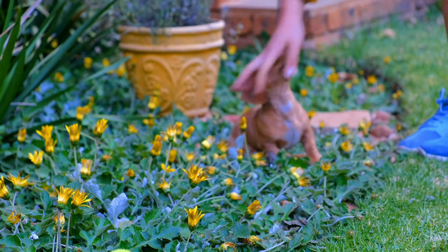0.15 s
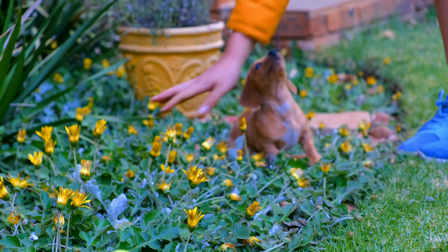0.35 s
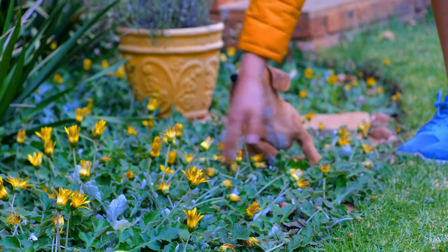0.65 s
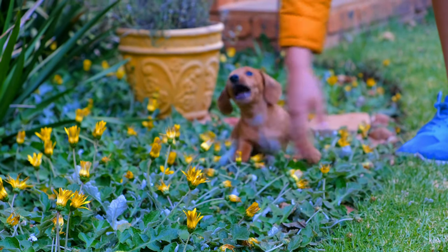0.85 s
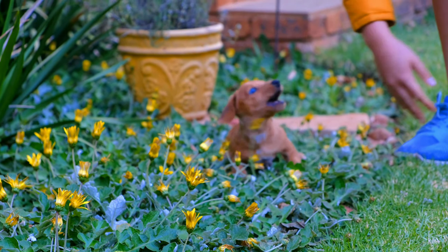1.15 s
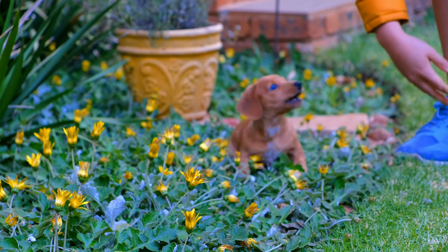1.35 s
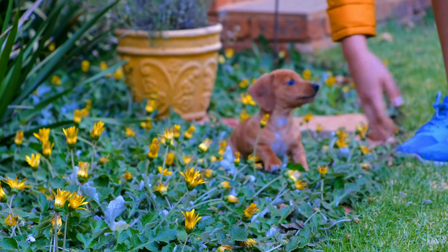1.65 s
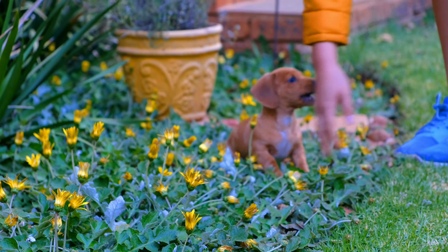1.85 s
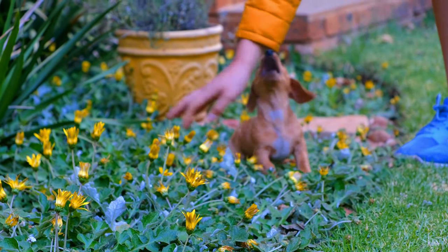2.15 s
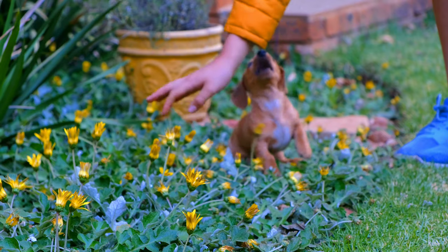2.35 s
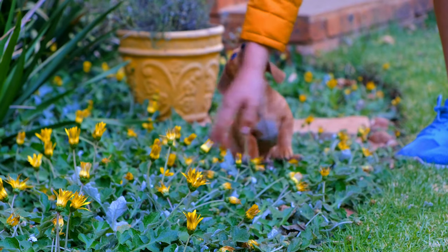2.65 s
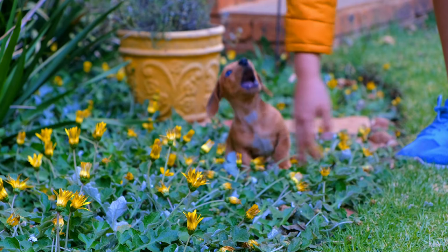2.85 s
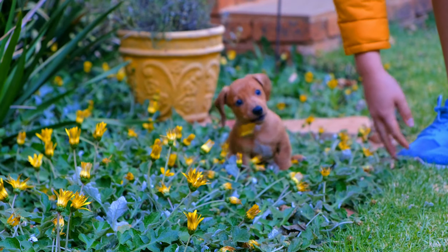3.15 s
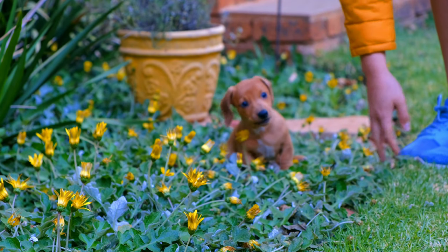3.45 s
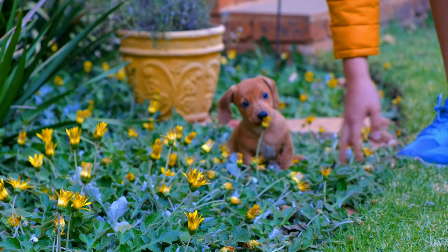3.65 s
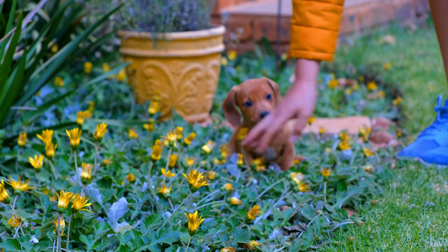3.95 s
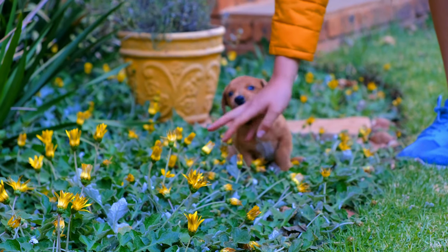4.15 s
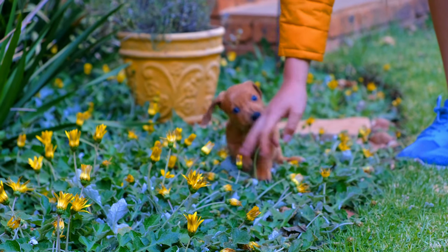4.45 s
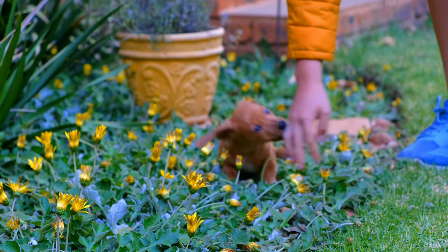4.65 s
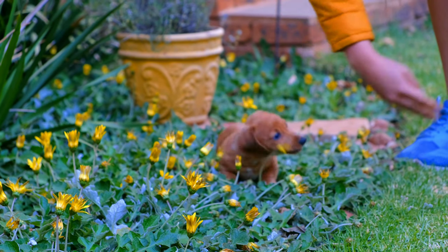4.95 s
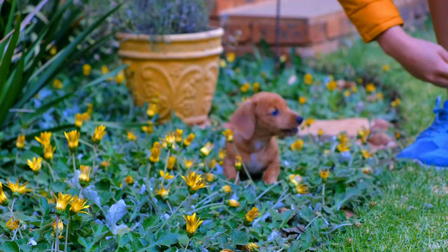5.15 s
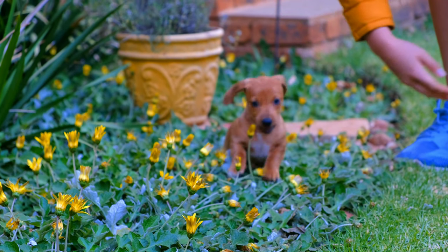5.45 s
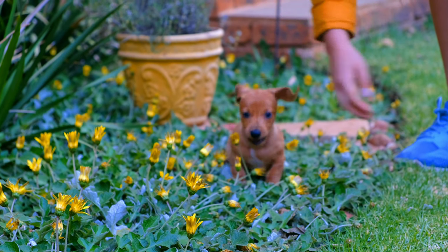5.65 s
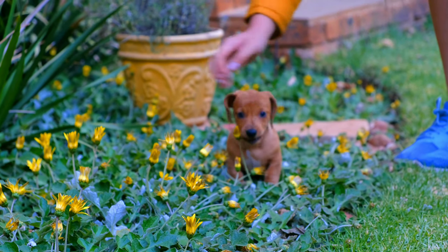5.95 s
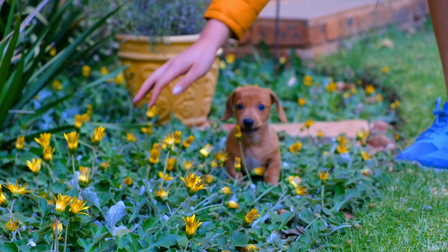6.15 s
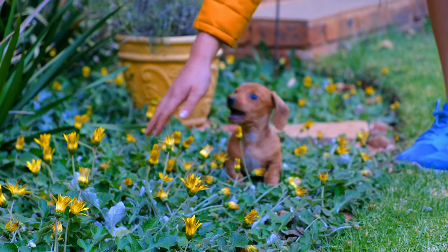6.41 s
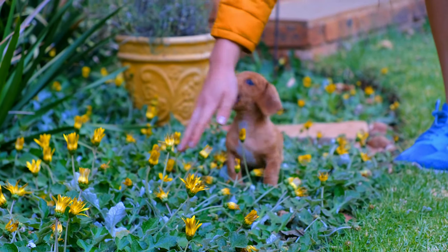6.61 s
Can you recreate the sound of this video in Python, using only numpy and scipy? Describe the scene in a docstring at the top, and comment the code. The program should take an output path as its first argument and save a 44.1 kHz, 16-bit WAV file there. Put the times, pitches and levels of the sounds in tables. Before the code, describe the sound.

Young puppy's sharp yelp and thin whimpering, a howl breaking high, then two pairs of raspy barks with a moan and growls, outdoors.

```python
"""Over a faint low rumble a small puppy yelps, whines and howls, then gives two hoarse double barks.
A moan follows the first pair; each pair sinks into a growl, the last one stuttering until the abrupt stop.
The voice is summed harmonics that flip between chest and falsetto, plus subharmonic rasp and filtered hiss.
Thin nasal whistles and a whimper are near-pure tones; growls are decaying throat resonances.
The puppy has a diffuse noise-built tail; very faint, brief sinking tones lie between the pairs of barks."""
import sys
import numpy as np
from scipy import signal
from scipy.fft import rfft, irfft, next_fast_len
from scipy.io import wavfile
from scipy.ndimage import uniform_filter1d, minimum_filter1d, map_coordinates

SR = 44100
rng = np.random.default_rng(int(sys.argv[2]) if len(sys.argv) > 2 else 0)


def transcribe(u):
    """Save the signal u as a 16-bit wav file named by the first command-line argument.

    u: samples, shape (n,) or (channels, n), limited to [-1, 1]; the rate is SR.
    q: integer samples, one column per channel.
    """
    v = np.clip(np.atleast_2d(u).T, -1, 1)
    q = np.round(v * 32767).astype(np.int16)
    wavfile.write(sys.argv[1], SR, q)


N = 298851
END_S, TOP_HZ = 6.243, 14200

# background spectrum, relative density: freq_hz, density_db
FLOOR_SPECTRUM = [(30, -37.5), (60, -24), (78, -8.5), (97, 0), (120, -6), (180, 0.5), (400, -9),
                  (1000, -16.5), (2000, -21), (9000, -27.5), (11700, -30.5), (14000, -52)]
FLOOR_DB = -64.5

# reverb decay: freq_hz, t60_s
TAIL_T60 = [(150, 0.45), (500, 0.73), (1100, 0.7), (1700, 0.5878), (3200, 0.42), (6000, 0.63), (12000, 0.2)]
# reverb spectrum: freq_hz, gain_db
TAIL_COLOUR = [(100, -4.5), (350, -0.5), (600, 0.5), (800, -3), (1100, 1.5), (1650, 5.5), (2000, -7.5),
               (2500, -3), (3300, 5), (4000, -2.5), (6000, -4.5), (12000, -10)]

# thin whistles: start_s, rise_s, fall_s, pitch_hz, end_pitch_hz, level_db
WHISTLES = [(.675, 0.072, .18, 5977, 5620, -38), (1.02, 0.14, .12, 2680, 2650, -66),
            (2.16, 0.18, .13, 5510, 5400, -49.5), (3.33, .27, .06, 4940, 4900, -73),
            (3.887, 0.059, .04, 6100, 6150, -55), (4.21, 0.1, .06, 6410, 6480, -63)]
# closed-mouth whimper: time_s, pitch_hz, level_db (before trim)
WHIMPER = [(1.04, 676, -56), (1.09, 667, -67), (1.372, 643, -58.5), (1.558, 632, -61.5),
           (1.83, 592.4, -59.5), (1.926, 577.5, -71), (2.344, 501, -65.5), (2.46, 471, -58.5)]
# nasal resonance on the whimper's octave: freq_hz, gain_db
NOSE_RESONANCE = [(1000, -16), (1210, -9.5), (1265, 2.5), (1300, -2), (1330, -21.5)]

# growls: start_s, end_s, level_db (before mouth filter), first_flaps_per_s
GROWLS = [(4.522, 4.561, -39, 150), (5.283, 5.29, -36, 130), (5.811, 6.249, -35, 190)]
# throat resonances in the growl: freq_hz, width_hz, level_db
GROWL_THROAT = [(239.7, 150, -5), (387, 130, 3), (1014.4, 108, -4)]
STUTTER_S, BURST_S = .0497, .027  # burst spacing and length
SLACK_FLAPS_PER_S, RELAX_S = 140, .1  # flapping settles to this rate, with this time constant

# cries: time_s, pitch_hz, level_db (before voice trim), overtones_db and rasp_db (both over level)
YELP_TRACK = [(.055, 297, -50, -8.5, -2), (.069, 510.3, -33.5, -11, -7.5), (.076, 607.2, -17.5, -8.5, -14),
              (.084, 681, -11.5, -9.5, -18.5), (.1, 776, -11, -6.5, -8), (.115, 751, -19, -1, -1),
              (.13, 805, -19.5, 5.5, -16), (.147, 817.7, -16.5, 4.5, -23), (.165, 806.7, -10, 0.5, -24.5),
              (.184, 739.5, -8, -12, -24.5), (.197, 682, -25, -9, -21)]
WHINE_TRACK = [(.188, 1477, -9.5, -9, -27), (.2, 1277, -25, -3, -28), (.22, 1240, -19, -9, -29),
               (.25, 1043, -20, -30, -27), (.3, 959, -37, -20, -15), (.42, 915, -41.5, -40, -26.5),
               (.475, 973, -32, -27, -29.5), (.505, 882, -34, -31, -40), (.58, 904.3, -37.5, -29, -46),
               (.645, 935.5, -37.5, -25, -48), (.69, 932, -48, -26, -41)]
YIP_TRACK = [(.914, 697, -45.5, -14, -25), (.924, 650, -37.5, -37.5, -28), (.945, 525, -34, -30, -16),
             (.97, 511, -34.5, -10.5, -32), (.997, 479.4, -32.5, -29, -30), (1.015, 402, -54, -35, -5)]
HOWL_TRACK = [(2.469, 560, -37, -26.5, -23.5), (2.478, 475, -25.5, -37, -31.5), (2.505, 467, -24, -32, -26),
              (2.514, 496.5, -24.5, -16, -12.5), (2.56, 533, -14, -18.5, -27.5),
              (2.58, 645.6, -14.5, -14, -10.5), (2.603, 666, -9, -24, -8), (2.63, 750, -15, -2, -2),
              (2.655, 803, -7.5, -19.5, -20), (2.672, 795, -23.5, -6, 7.5), (2.692, 790.4, -17.5, -11, 7),
              (2.722, 708, -11, -23.5, -14.5), (2.745, 646, -23.5, -21.5, -7.5)]
WAIL_TRACK = [(2.73, 1323, -18, -35.5, -14.5), (2.75, 1198, -18, -24.5, -11),
              (2.778, 869.6, -16, -29.5, -11), (2.815, 853.4, -16, -33.5, -20.5),
              (2.835, 867, -20.5, -33.5, -17.5), (2.848, 1069, -16.5, -32.5, -14),
              (2.905, 1145, -8.5, -33.5, -33), (2.93, 1017, -23.5, -23.5, -14), (2.955, 661, -27, -31, -10),
              (2.987, 491, -29, -23.5, -18), (3.01, 424.5, -54.5, -6, -4)]
MOAN_TRACK = [(4.21, 290.8, -33, -6, 0), (4.28, 231.6, -31, -8.5, -20), (4.378, 348.6, -30, -6, -25),
              (4.395, 592, -27.5, -20, -17.5), (4.45, 547, -27.5, -17.5, -18),
              (4.47, 343, -35, -27.5, -20.5), (4.5, 337, -35, -26, -10), (4.53, 247.7, -58.5, -18, -7)]

# overtone response of the throat, bright cries: freq_hz, gain_db
YELP_THROAT = [(900, -11), (1500, -0.5), (2000, 1), (2440, -5), (2750, -20.5), (3170, -14.5), (3550, -17.5),
               (4050, -17), (4550, -31.5), (5200, -23.5), (6570, -23.5), (8500, -30.5), (11500, -38.5),
               (14000, -62)]
# same, dark barks and moan: freq_hz, gain_db
BARK_THROAT = [(500, 0.5), (800, 18), (1200, 17), (1750, -6.5), (2130, -18), (2400, -26.5), (2800, -30),
               (3290, -31.5), (3900, -44), (7850, -36.5), (11600, -58), (14000, -75)]
# rasp spectrum, bright cries, relative: freq_hz, density_db
YELP_RASP = [(40, -50.5), (130, -40), (330, -19.5), (520, -8.5), (800, -1.5), (1200, -2.5), (1600, 5),
             (1850, -6), (2200, -29), (4000, -70.5)]
# same, dark barks and moan: freq_hz, density_db
BARK_RASP = [(40, -47), (120, -28), (320, -29.5), (530, -1), (850, 1), (1230, 6), (1700, -0.5), (2100, -14),
             (2400, -24.5), (4000, -67.5)]
# breath hiss spectrum, bright cries, relative: freq_hz, density_db
YELP_HISS = [(40, -34.5), (200, -17.5), (1400, -20.5), (1950, -1), (2420, -2), (2750, -16), (3150, -8),
             (3500, -15.5), (4000, -14.5), (4500, -26), (6800, -20), (11400, -27.5), (14000, -54)]
# same, dark barks and moan: freq_hz, density_db
BARK_HISS = [(40, -30.5), (200, -8), (1400, -22.5), (1900, 1), (2120, -3), (2400, -11.5), (2850, -17),
             (3350, -15.5), (3800, -30.5), (4900, -23.5), (6900, -30), (7900, -23), (11600, -36),
             (14000, -59.5)]
# mouth gain on a falsetto note's octave: octave_hz, gain_db
OCTAVE_PASS = [(1000, -7), (1750, 0.5), (1950, -6.5), (2200, -27)]

# barks: start_s, lead_s, rise_s, fall_s, hold (exponent: 1 = straight fall, more = held, then dropped),
#        start_pitch_hz, top_pitch_hz, level_db (at top pitch, before voice trim), rasp_db,
#        late_octave_db (over fundamental), hiss_db, bite_db
BARKS = [(3.664, 0.011, 0.062, 0.14, 4.4, 487, 650.4, -14, 0.16, 13, -2.5, 5),
         (3.943, .06, 0.077, 0.18, 1.46, 340.3, 710.4, -15, 0.94, 17.5, -6.5, 1.5),
         (5.306, .011, .06, .14, 2.0, 235.3, 636.5, -13, -0.77, 3.5, -5.5, 12),
         (5.574, 0.058, .055, .135, 1.8, 288.8, 648.6, -14.5, 1, 6.5, -7.5, 3)]
SLACK_HZ, SLACK_SAG_HZ_PER_S = 285.3, 900  # relaxed folds after a bark: pitch and its sinking rate
LEAD_DB = 27  # depth of the bark's fade-in
TRAIL_S, TRAIL_DB_PER_S = .075, 69  # slack grumble after the bark
LOUDER_DB_PER_OCTAVE, HISSIER_DB_PER_OCTAVE = 12.5, 6  # effort lifts pitch, level and hiss together
# at the top pitch the overtones lie above the throat's resonance
BARK_OVERTONES_DB, DULLER_DB_PER_OCTAVE = -26, 17
RASP_BUILD_S, RASP_BUILD_DB = 0.0083, 21.5  # a bark starts clean, turns hoarse
HISS_FADE_DB_PER_S = 42.5  # and runs out of air
BITE_S = 0.02  # hiss burst as the mouth opens widest
SLACK_RASP_DB_PER_OCTAVE = 1.5  # slack folds are hoarser


def amp(db):
    """Decibels to amplitude."""
    return 10 ** (np.asarray(db) / 20)


def unit(x):
    """x scaled to unit RMS."""
    return x / np.sqrt(np.mean(x ** 2) + 1e-20)


def along(points, hz):
    """(Hz, value) points interpolated on a log-frequency axis."""
    f, v = np.transpose(points)
    return np.interp(np.log(hz + 1), np.log(f + 1), v)


def curves(rows):
    """Sample numbers a table spans, a soft gate, and one curve per column."""
    s, *cols = np.transpose(rows)
    at = np.arange(max(int(s.min() * SR), 0), min(int(s.max() * SR), N))
    gate = np.clip(np.minimum(at - at[0], at[-1] - at) / (.004 * SR), 0, 1)
    return at, gate, [np.interp(at / SR, s, c) for c in cols]


def wobble(at, knots_per_s):
    """Smooth random curve."""
    knots = rng.standard_normal(4096)
    return map_coordinates(knots, [(at - at[0]) * knots_per_s / SR], mode="wrap")


def cycles(hz):
    """Running phase of a pitch curve, in radians."""
    return 2 * np.pi * np.cumsum(hz) / SR


def colour(x, spectrum):
    """x through a smooth spectral filter."""
    m = next_fast_len(len(x) + SR // 10)
    gain = amp(along(spectrum, np.fft.rfftfreq(m, 1 / SR)))
    return irfft(rfft(x, m) * gain, m)[:len(x)]


def placed(at, sound):
    """A sound at its place in the silence."""
    return np.bincount(at, sound, minlength=N)


def background(hum_hz=97, hum_db=-75):
    """Faint outdoor rumble: filtered noise with a low hum wavering in pitch and level."""
    at = np.arange(N)
    hum_level = np.sqrt(2) * amp(hum_db + 2.5 * wobble(at, 2.4))
    hum = hum_level * np.sin(cycles(hum_hz * (1 + 0.012 * wobble(at, 12))))
    return hum + amp(FLOOR_DB) * unit(colour(rng.standard_normal(N), FLOOR_SPECTRUM))


def faint_tones(count=30, centre_hz=4000, centre_db=-75, sink=0.041):
    """Very faint, brief sinking tones between the two pairs of barks, blurred by pitch wobble."""
    start_s, end_s, length_s, blur = 4.55, 5.25, .14, .014
    out, u = np.zeros(N), np.linspace(0, 1, int(length_s * SR))
    for when, pitch, glide, size in rng.uniform(-1.1, 1, (count, 4)):
        bend = 1 - sink * abs(glide) * u + blur * wobble(np.arange(len(u)), 200)
        hz = centre_hz * (1 + .3 * pitch) * bend
        s = start_s + (end_s - start_s) * (when + 1) / 2 - length_s / 2
        tone = amp(centre_db + 5.9 * size) * np.sin(np.pi * u) ** 2 * np.sin(cycles(hz))
        out[round(s * SR):][:len(u)] += tone
    return out


def reverb(x, delay_s=0.02, build_s=0.024):
    """Diffuse tail: noise that swells after a delay, then decays at a rate set by frequency."""
    hz, t, z = signal.stft(rng.standard_normal(SR + SR // 2), SR, nperseg=256)
    shape = amp(along(TAIL_COLOUR, hz)[:, None] - 60 * t / along(TAIL_T60, hz)[:, None])
    shape = shape * np.clip((t - delay_s) / build_s, 0, 1)
    tail = signal.istft(z * shape, SR, nperseg=256)[1]
    return signal.fftconvolve(x, tail / np.sqrt(SR / 10))[:N]


def whistles(octave_db=-26, half_db=-31, fade_db=26, scoop=.015, waver=.003):
    """Nasal whistles scoop up, swell and slip off pitch; weak octave and lines halfway between."""
    out = np.zeros(N)
    for start, rise, fall, hz, end_hz, db in WHISTLES:
        top = start + rise
        at, gate, (early, late) = curves([(start, 1, 0), (top, 0, 0), (top + fall, 0, 1)])
        pitch_hz = hz * (1 - scoop * early + waver * wobble(at, 160)) + (end_hz - hz) * late ** 4
        phase = cycles(pitch_hz)
        halfway = np.sin(phase / 2) / 2 + np.sin(phase + phase / 2)
        level = gate * np.sqrt(2) * amp(db - fade_db * (early ** 2 + late ** 0.73))
        out[at] += level * (np.sin(phase) + amp(octave_db) * np.sin(2 * phase) + amp(half_db) * halfway)
    return out


def whimper(trim_db=0.9, fifth_harmonic_db=-20):
    """Faint, nearly pure closed-mouth note, sinking slowly; a nasal resonance lifts its octave."""
    at, gate, (hz, db) = curves(WHIMPER)
    phase = cycles(hz * (1 + 0.0033 * wobble(at, 42)))
    octave = amp(along(NOSE_RESONANCE, 2 * hz)) * np.sin(2 * phase)
    tone = np.sin(phase) + octave + amp(fifth_harmonic_db) * np.sin(5 * phase)
    return placed(at, gate * np.sqrt(2) * amp(db + trim_db) * tone)


def growl(scatter_s=0.00076, attack_s=.0009, swell_s=0.0011, stumble_s=.001):
    """Near-even bursts of a few slack flaps of the folds; each flap rings the throat resonances."""
    t, out = np.arange(SR // 10) / SR, np.zeros(N)
    for start, end, db, first_rate in GROWLS:
        for s in np.arange(start, end - .005, STUTTER_S):
            length = min(BURST_S, end - s)
            rate = SLACK_FLAPS_PER_S + (first_rate - SLACK_FLAPS_PER_S) * np.exp((start - s) / RELAX_S)
            slips = rng.normal(0, scatter_s, size=8)
            flaps = np.arange(len(slips)) / rate
            struck = (flaps + np.abs(slips))[flaps < length - .004, None]
            age = np.maximum(t - struck, 0)
            ring = 0
            for hz, width, level in GROWL_THROAT:
                decay = np.exp(-np.pi * width * age)
                ring = ring - amp(level + rng.normal(0, 1.8)) * np.sin(2 * np.pi * hz * age) * decay
            # soft flap onsets, and strength gathering as the burst begins
            burst = (ring * (1 - np.exp(-(age / attack_s) ** 2))).sum(0) * (1 - np.exp(-t / swell_s))
            rms = np.sqrt(np.sum(burst ** 2) / (length * SR))
            out[round((s + rng.normal(0, stumble_s)) * SR):][:len(t)] += amp(db) * burst / rms
    # the half-closed mouth passes neither deep bass nor treble
    return colour(out, [(40, -26), (130, -1.5), (250, 5.5), (1300, -7), (2200, -11.5), (5000, -26)])


def rattle(at, hz, phase, spectrum, lip_hz=950, opening=0.91, flicker_per_s=65):
    """Chaotic folds: flickering subharmonics glide with pitch; the mouth opens as pitch rises."""
    steps = np.arange(2, 29)[:, None] / 5  # multiples of a fifth of the pitch
    lines_hz = steps * hz
    gains = amp(along(spectrum, lines_hz)) / np.sqrt(1 + (lines_hz / (lip_hz + opening * hz)) ** 10)
    gains /= np.linalg.norm(gains, axis=0)
    total = np.zeros(len(at))
    for k, gain in zip(steps, gains):
        sine = wobble(at, flicker_per_s) * np.sin(k * phase)
        cosine = wobble(at, flicker_per_s) * np.cos(k * phase)
        total += gain * (sine + cosine)
    return unit(total)


def folds(at, hz, db, octave_db, upper_db, rasp_db, hiss_db, colours, jitter, tilt_db, clear_hz=7500):
    """Folds through the throat: rasp makes them beat unevenly; hiss grows with overtones and rasp."""
    throat, rasp, hiss = colours
    rough = amp(rasp_db) / np.sqrt(1 + amp(upper_db) ** 2 + amp(rasp_db) ** 2)
    phase = cycles(hz * (1 + jitter * rough * wobble(at, 350)))
    # fundamental and octave share the level; overtones follow the throat, tilted by tilt_db an octave
    first = 1 / np.sqrt(1 + amp(octave_db) ** 2)
    orders = np.arange(3, 21)[:, None]
    upper = amp(along(throat, orders * hz) + tilt_db * np.log2(orders)) * (orders * hz < TOP_HZ)
    upper /= np.sqrt(1 + (orders * hz / clear_hz) ** 10)  # the highest overtones are lost in the hiss
    upper *= amp(upper_db) / np.linalg.norm(upper, axis=0)
    tone = np.zeros(len(at))
    for k, gain in enumerate([first, first * amp(octave_db), *upper], 1):
        level = np.sqrt(2) * gain * (1 + 0.82 * rough * wobble(at, 160))
        tone += level * np.sin(k * phase + rng.uniform(0, 2 * np.pi))
    # air tears through the folds once a cycle
    puffs = (1 + 0.51 * np.cos(phase)) * amp(0.83 * wobble(at, 200))
    breath = unit(colour(puffs * rng.standard_normal(len(at)), hiss))
    air = amp(hiss_db + (upper_db + rasp_db) / 2) * breath
    return amp(db) * (tone + air + amp(rasp_db) * rattle(at, hz, phase, rasp))


def falsetto(rows, colours, octave_db, jitter, tilt_db, purer_db, hiss_db):
    """High note: the mouth shapes its octave; overtones fall purer_db faster per octave of climb."""
    at, gate, (hz, db, upper_db, rasp_db) = curves(rows)
    slope_db = tilt_db - purer_db * np.log2(hz / np.median(hz))
    passed_db = octave_db + along(OCTAVE_PASS, 2 * hz)
    sound = folds(at, hz, db, passed_db, upper_db, rasp_db, hiss_db, colours, jitter, slope_db)
    return placed(at, gate * sound)


def cry(rows, colours, flip_at_s, flip_s, before_db, after_db, jitter, tilt_db, hiss_db):
    """Chest note flipping register: the octave's lead over the fundamental moves before_db to after_db."""
    at, gate, (hz, db, upper_db, rasp_db) = curves(rows)
    octave_db = before_db + (after_db - before_db) * (1 + np.tanh((at / SR - flip_at_s) / flip_s)) / 2
    sound = folds(at, hz, db, octave_db, upper_db, rasp_db, hiss_db, colours, jitter, tilt_db)
    return placed(at, gate * sound)


def bark(row, colours, flip_after_s=0.037, flip_s=0.049, chest_db=-9, jitter=.05, tilt_db=-3):
    """One push of effort: pitch arches, level follows; past the top the octave emerges, folds go slack."""
    (start, lead, rise, fall, hold, start_hz, top_hz,
     level_db, rasp_db, late_db, hiss_db, bite_db) = row
    at, gate, _ = curves([(start - lead,), (start + rise + fall + TRAIL_S,)])
    age = at / SR - start
    falling, trailing = np.maximum(age - rise, 0), np.maximum(age - rise - fall, 0)

    arch_hz = start_hz + (top_hz - start_hz) * np.sin(np.pi / 2 * np.clip(age / rise, -.15, 1))
    drop_hz = (top_hz - SLACK_HZ) * np.minimum(falling / fall, 1) ** hold
    hz = np.maximum(arch_hz - drop_hz - SLACK_SAG_HZ_PER_S * trailing, SLACK_HZ / 2)
    octaves = np.log2(hz / top_hz)

    fade_db = LEAD_DB * np.minimum(age / lead, 0) ** 2 + TRAIL_DB_PER_S * trailing
    db = level_db + LOUDER_DB_PER_OCTAVE * octaves - fade_db
    flip = (1 + np.tanh((age - rise - flip_after_s) / flip_s)) / 2
    octave_db = chest_db + (late_db - chest_db) * flip
    upper_db = BARK_OVERTONES_DB - DULLER_DB_PER_OCTAVE * octaves

    clean_db = RASP_BUILD_DB * np.exp(-np.maximum(age, 0) / RASP_BUILD_S)
    hoarse_db = rasp_db - SLACK_RASP_DB_PER_OCTAVE * octaves - clean_db
    bite = bite_db * np.exp(-((age - .88 * rise) / BITE_S) ** 2)
    air_db = hiss_db + HISSIER_DB_PER_OCTAVE * octaves - HISS_FADE_DB_PER_S * falling + bite
    sound = folds(at, hz, db, octave_db, upper_db, hoarse_db, air_db, colours, jitter, tilt_db)
    return placed(at, gate * sound)


def voice(trim_db=-0.7):
    """Bright yelps and howls that break into falsetto, then darker, hoarse barks and a moan."""
    bright, dark = (YELP_THROAT, YELP_RASP, YELP_HISS), (BARK_THROAT, BARK_RASP, BARK_HISS)
    calls = [
        cry(YELP_TRACK, bright, flip_at_s=0.15, flip_s=.045, before_db=-17, after_db=19.5,
            jitter=.008, tilt_db=-1.5, hiss_db=-3),
        falsetto(WHINE_TRACK, bright, octave_db=-11.5, jitter=.008, tilt_db=3.5, purer_db=22.5, hiss_db=-6.5),
        cry(YIP_TRACK, bright, flip_at_s=0.98, flip_s=0.017, before_db=-22, after_db=-2.5,
            jitter=0.013, tilt_db=0, hiss_db=-5),
        cry(HOWL_TRACK, bright, flip_at_s=2.616, flip_s=.005, before_db=-16, after_db=17.5,
            jitter=.012, tilt_db=-0.24, hiss_db=-6),
        falsetto(WAIL_TRACK, bright, octave_db=-3.0, jitter=.03, tilt_db=-22, purer_db=4, hiss_db=-3),
        cry(MOAN_TRACK, dark, flip_at_s=4.34, flip_s=0.05, before_db=8.5, after_db=-12.5,
            jitter=0.037, tilt_db=4.5, hiss_db=-18)]
    barks = [bark(row, dark) for row in BARKS]
    return amp(trim_db) * (sum(calls) + sum(barks))


def scene():
    """Puppy with its reverb tail, over faint tones and rumble."""
    puppy = voice() + whimper() + whistles() + growl()
    return (puppy + amp(-9) * reverb(puppy) + faint_tones() + background())[None]


def record(dry):
    """Fast limiter on the peaks, steep treble cutoff, abrupt stop."""
    ceiling = .72
    needed = ceiling / np.maximum(np.abs(dry), ceiling)
    held = minimum_filter1d(needed, size=201)
    limited = dry * uniform_filter1d(uniform_filter1d(held, size=101), size=101)
    limited = limited * np.clip((END_S - np.arange(N) / SR) / .003, 0, 1)
    m = next_fast_len(N + SR // 2)
    cutoff = np.clip((TOP_HZ + 200 - np.fft.rfftfreq(m, 1 / SR)) / 300, 0, 1)
    return irfft(rfft(limited, m) * cutoff, m)[..., :N]


dry = scene()
out = record(dry)
transcribe(out)
```